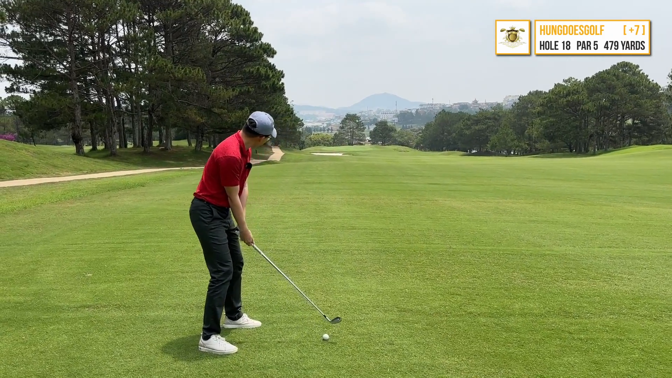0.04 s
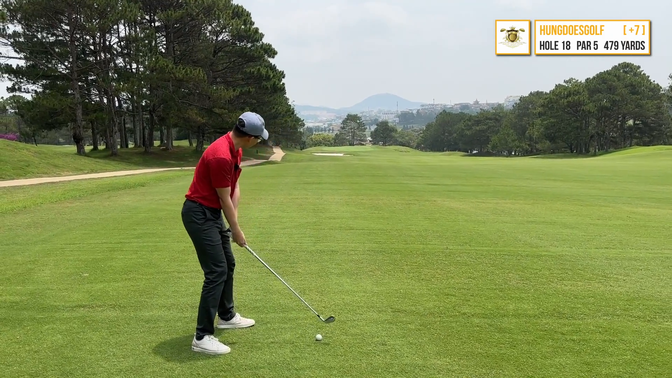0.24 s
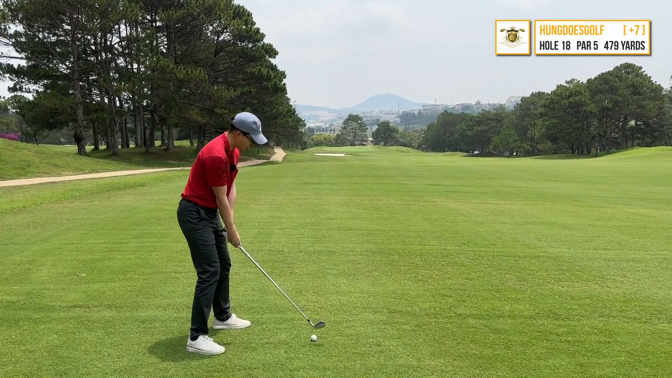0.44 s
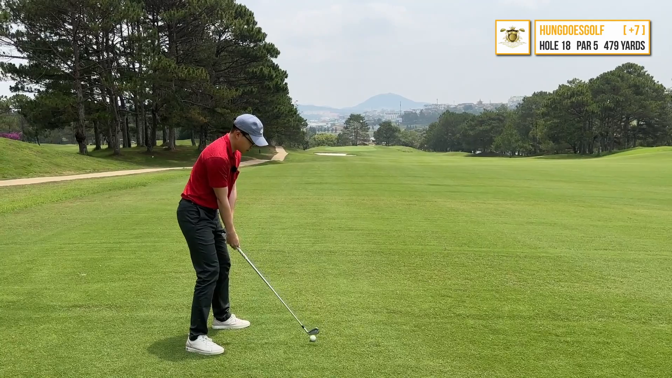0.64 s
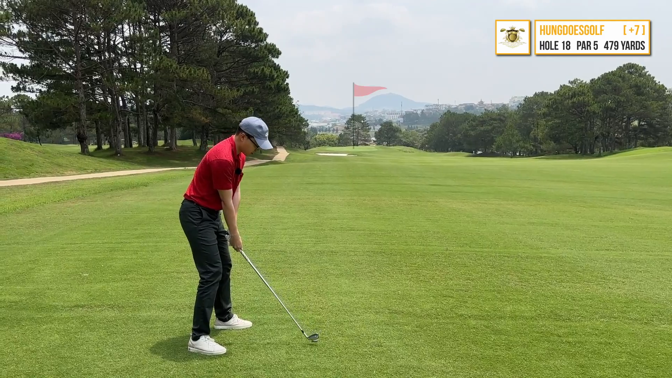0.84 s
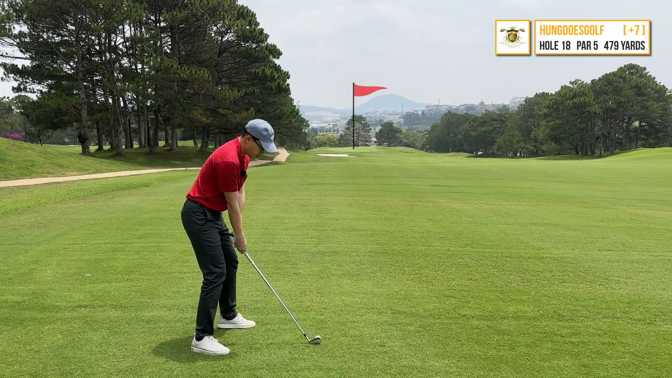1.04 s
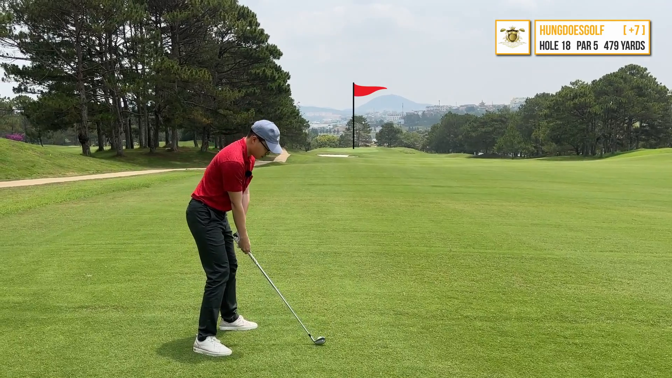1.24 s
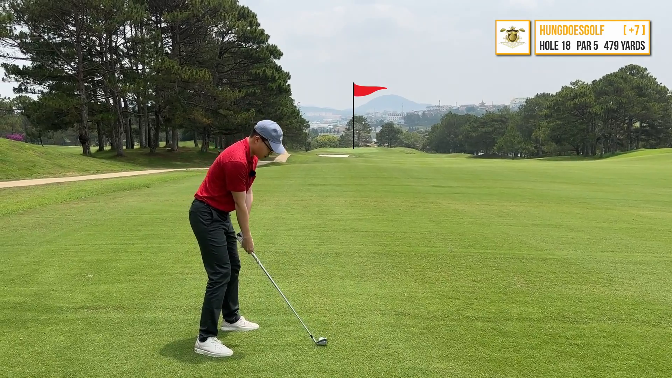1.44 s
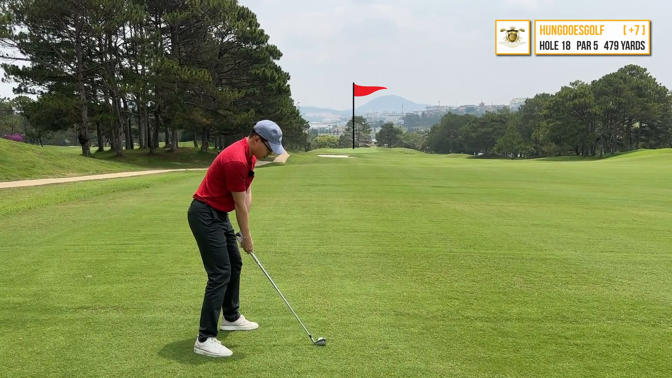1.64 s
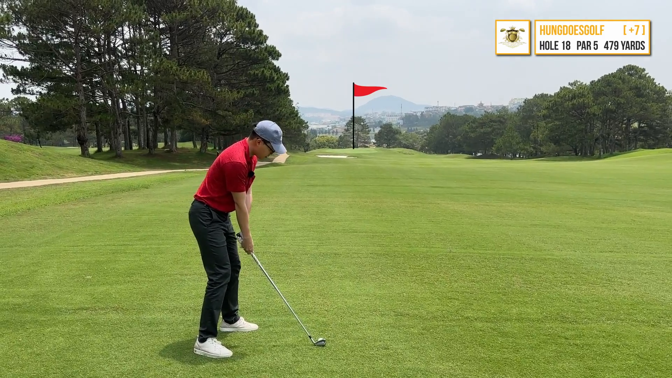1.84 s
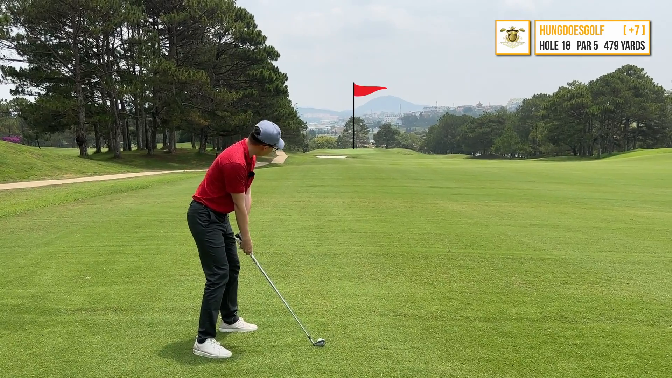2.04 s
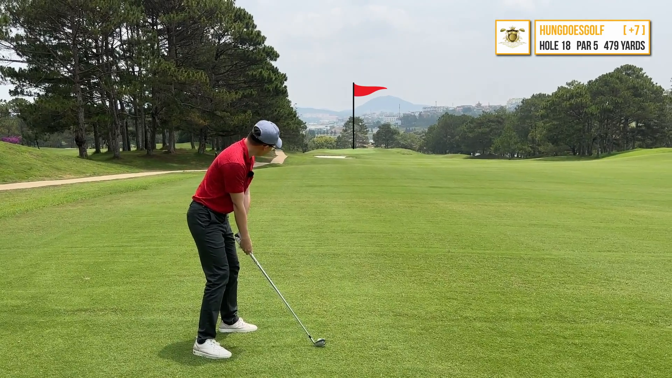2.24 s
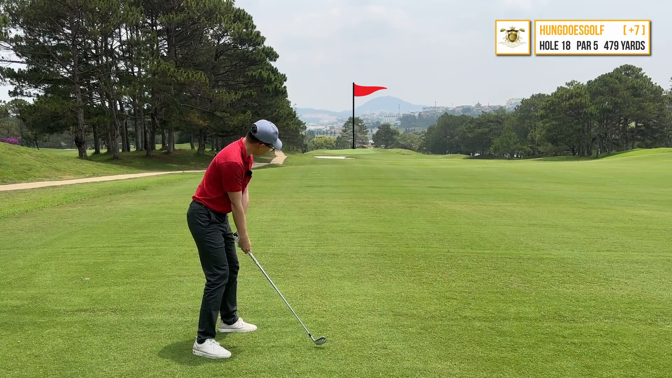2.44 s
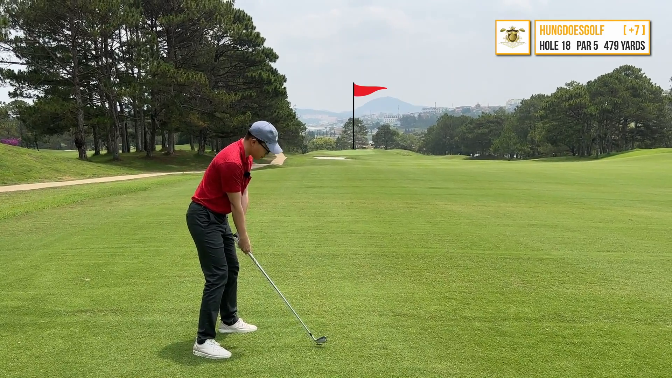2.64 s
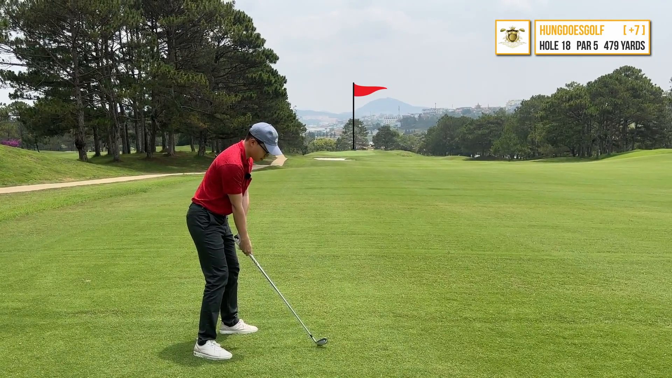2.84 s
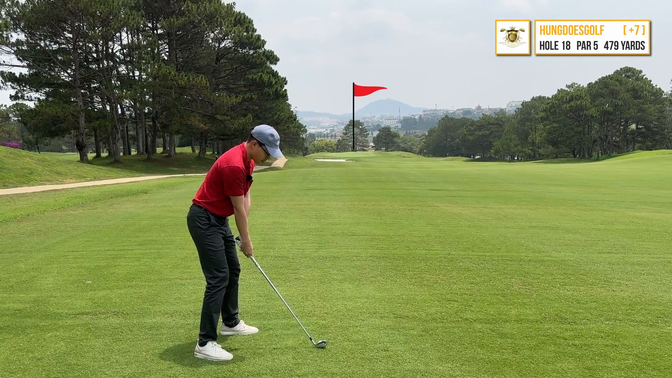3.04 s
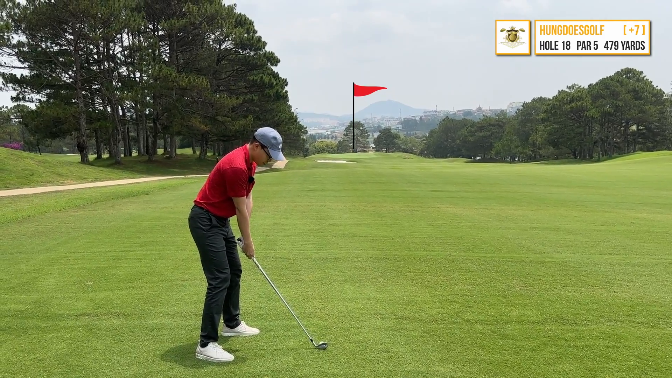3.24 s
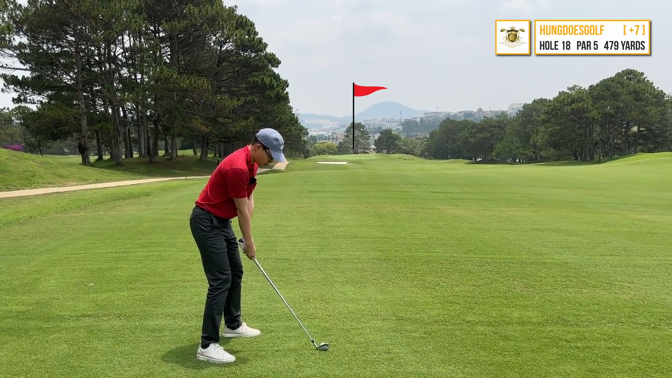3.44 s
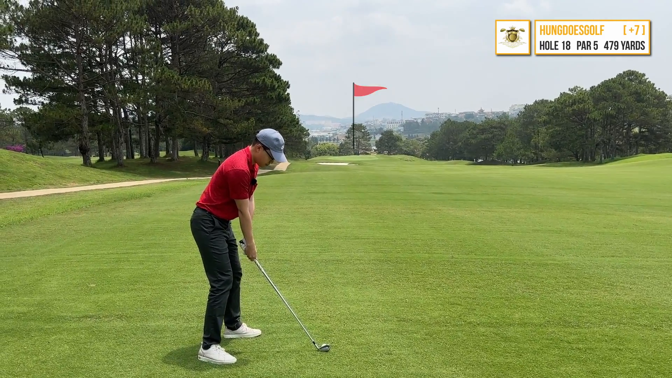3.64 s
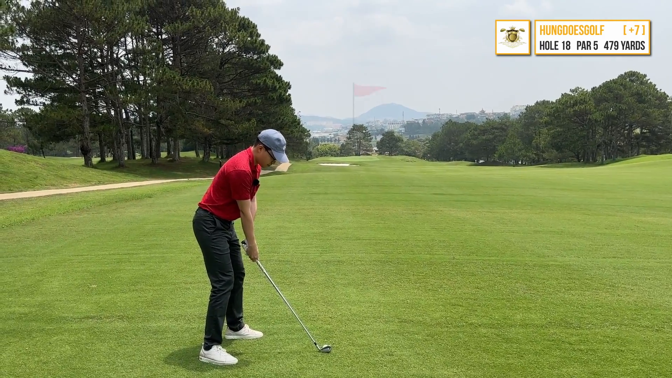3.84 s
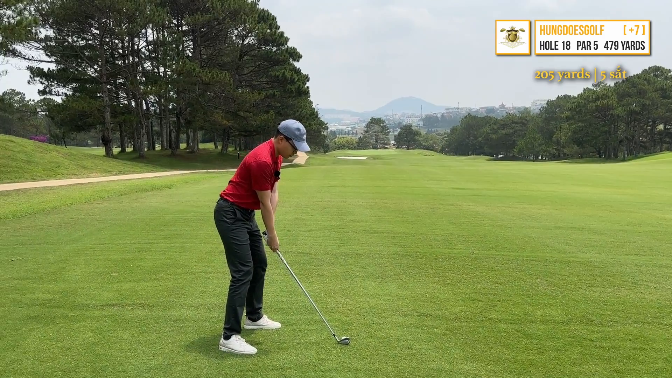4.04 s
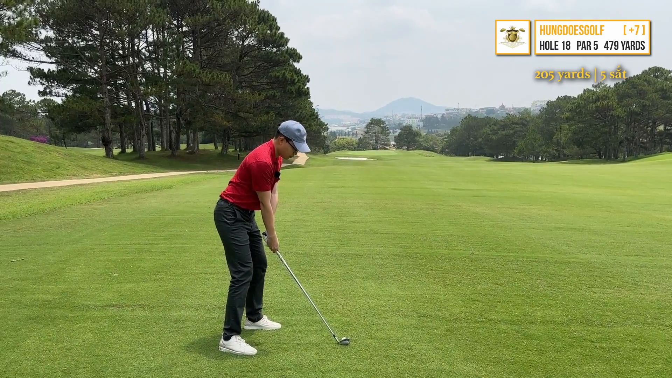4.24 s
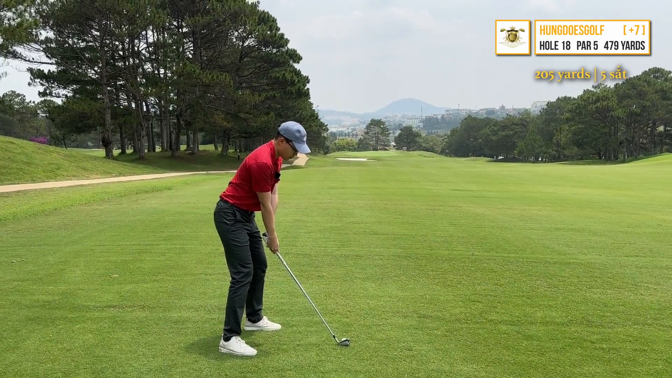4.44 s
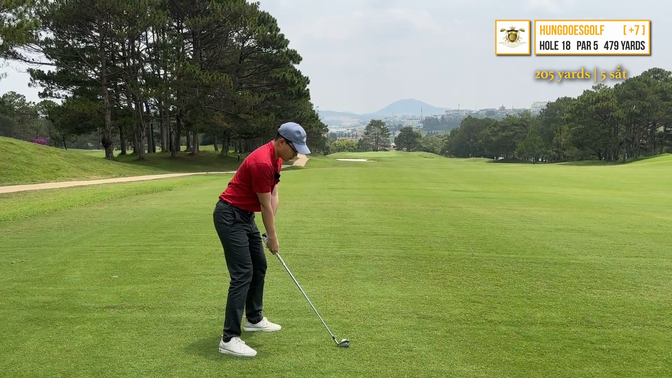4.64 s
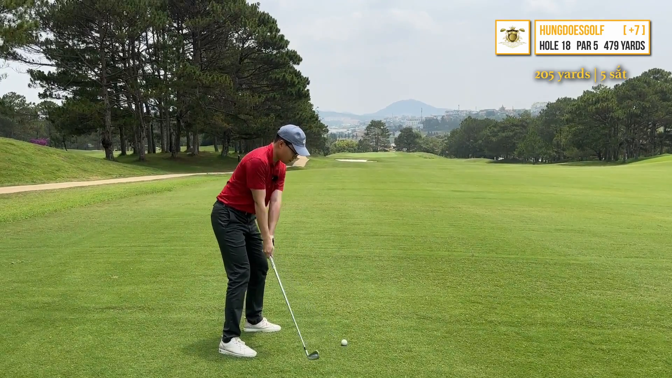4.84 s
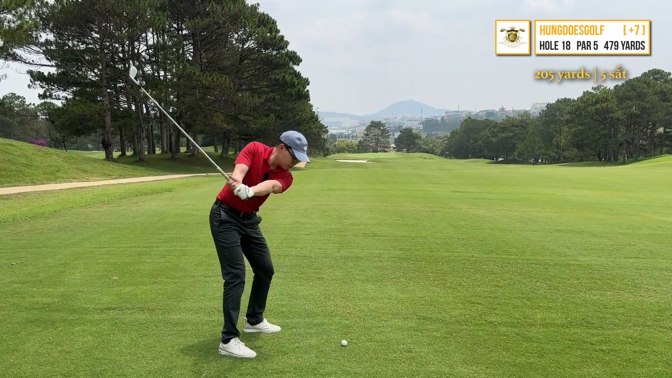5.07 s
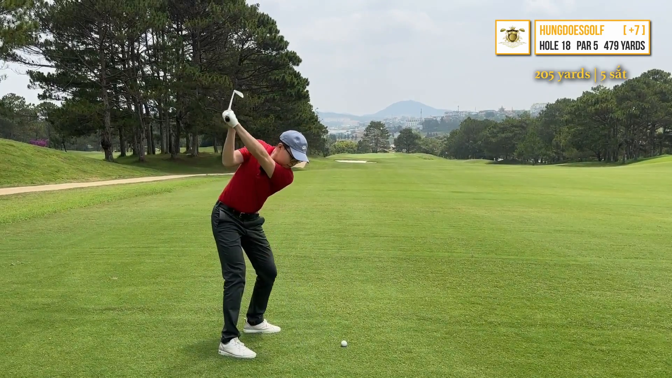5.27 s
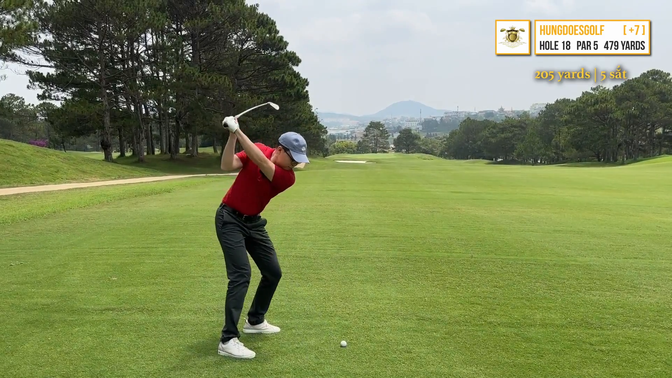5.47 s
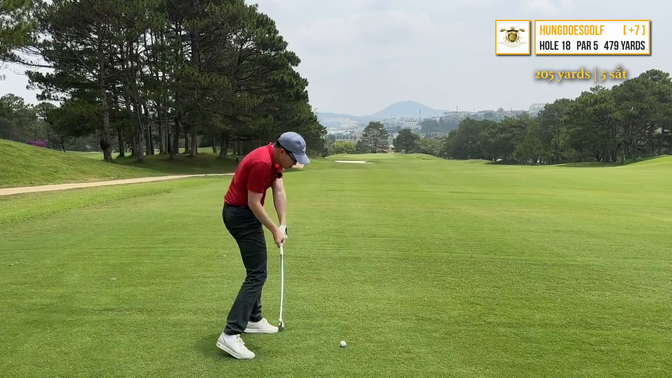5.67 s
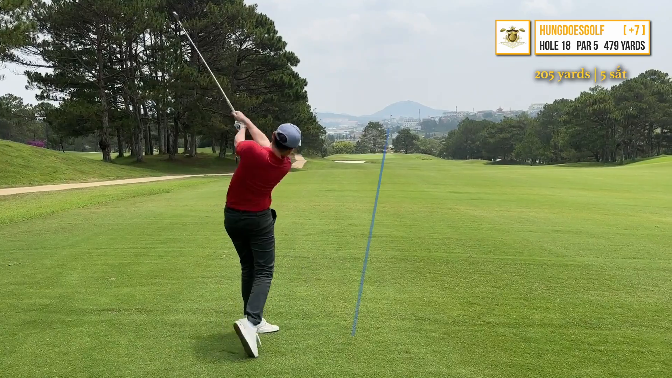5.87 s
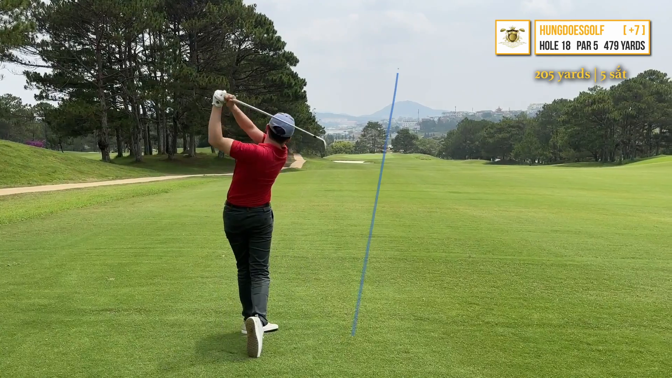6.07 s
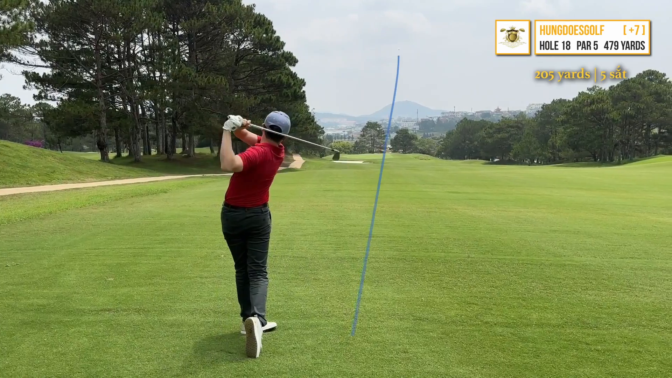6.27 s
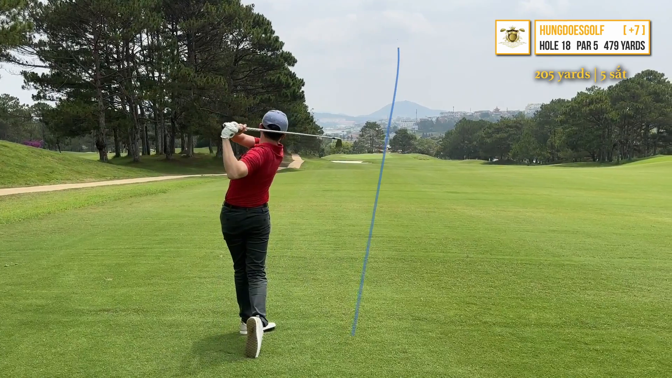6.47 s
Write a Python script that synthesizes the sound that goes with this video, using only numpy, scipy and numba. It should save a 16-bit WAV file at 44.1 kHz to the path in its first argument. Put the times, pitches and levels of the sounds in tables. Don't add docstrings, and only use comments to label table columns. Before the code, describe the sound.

Insects shimmer quietly outdoors for five seconds before clothing rustles, a golf club whips down, cracks the ball hard, and a heel thuds softly.

```python
import sys
import numpy as np
from scipy import signal
from scipy.fft import rfft, irfft, next_fast_len
from scipy.io import wavfile
from numba import njit

SR = 44100
rng = np.random.default_rng(int(sys.argv[2]) if len(sys.argv) > 2 else 0)


def field_ratio(decibels):
    return 10 ** (np.asarray(decibels, dtype=float) / 20)


def unload_audio(sound):
    columns = np.transpose(np.atleast_2d(sound))
    steps = np.round(np.clip(columns, -1, 1) * 32767)
    wavfile.write(sys.argv[1], SR, steps.astype(np.int16))


N = 287085

# (frequency [Hz], width [Hz], level [dB])
HIGH_TYMBAL = [(5396.5, 710, 0), (5620, 420, -1), (6300, 750, -0.5), (6772, 300, -7.5)]
LOW_TYMBAL = [(2903, 810, -2), (3500, 1400, -4.5), (4190, 1200, -2)]
# (time [s], level
# [dB], tilt [dB/octave])
CHORUS = [(0, -1, 6), (.28, -1, 6), (.5, 0, 5), (1.0, 0, 2), (1.4, -1.5, 0), (1.64, 1, -8), (1.85, 0, 2),
          (2.2, 0, -3), (2.5, 0, -8), (2.8, -1, 0), (3.05, 0, 0), (3.3, 0, -8), (3.65, .5, -4),
          (3.93, -1, 0), (4.1, .5, 2), (4.46, 0, -4), (4.8, 0, 2)]
# (time [s], level [dB])
BREEZE = [(0, -76), (.35, -73.5), (.5, -78.5), (.86, -69.5), (1.1, -78.5), (1.27, -71), (1.42, -81),
          (1.55, -74), (1.7, -81), (1.93, -70), (2.1, -72.5), (2.4, -80.5), (2.6, -78.5), (2.93, -72),
          (3.3, -76.5), (3.85, -76.5), (4.44, -76), (4.8, -72.5)]
# (time [s], level [dB])
BODY_SHAKE = [(4.6, -86), (5.02, -67), (5.22, -64), (5.44, -68), (5.51, -55), (5.69, -52), (5.83, -62.5),
              (6.51, -61)]
# (time [s], level [dB])
SUPPRESSOR = [(0, -2), (.6, 0), (4.3, 0), (4.65, -4), (4.83, -1.5), (4.86, -6), (5.0, -15), (5.36, -11),
              (5.45, -28)]
# (frequency [Hz], level [dB/Hz])
MURMUR_SPECTRUM = [(250, -8), (400, -2.5), (900, -1.5), (1500, -5), (2400, -6.5), (2800, -24)]
RUMBLE_SPECTRUM = [(18, -42.5), (30, -16), (91, 1.5), (188, -3), (301, -12.5), (364, -16), (500, -22.5),
                   (650, -54)]
AIR_SPECTRUM = [(2200, -12.5), (7000, -7), (9000, -13), (12000, -21), (13800, -26), (15500, -38)]
# (frequency [Hz], level [dB/Hz])
DULL_CLOTH = [(150, -15.5), (350, -3.5), (800, -0.5), (1600, -8.5), (2600, -7.5), (5000, -31)]
MIDDLE_CLOTH = [(800, -27), (1600, -14), (2500, 0.5), (4200, -1), (6500, -3.5), (9000, -15), (12000, -30.5)]
BRIGHT_CLOTH = [(4000, -18.5), (6000, -7), (7500, 0), (10500, -4), (13000, -12), (15500, -25)]
# (peak time [s], level [dB], 20 dB rise [s], 20 dB fall [s], brightness [dB])
RUBS = [(.105, -73, .06, .05, 10), (.25, -72, .06, .1, 10), (.37, -70.5, .3, .08, 10),
        (4.05, -76, .04, .3, 14), (4.31, -76, .1, .15, 14), (4.55, -73.5, 0.01, .06, 14),
        (4.66, -75, 0.47, .5, 4), (4.9, -79, 0.44, 0.73, 0.5), (5.12, -68, 0.42, .3, 1),
        (5.39, -57.5, 0.12, 0.4144, 11.5), (5.44, -57, 0.129, 0.1146, 5), (5.462, -47, .012, .06, 7),
        (5.477, -44, .04, .018, 6), (5.497, -56, .05, .05, -7), (5.54, -53.5, 0.307, 0.1044, 6),
        (5.575, -62, 0.0333, 0.08, -6), (5.66, -68, 0.2935, 0.46, -8), (5.745, -64, .15, 0.22, -2),
        (5.87, -70, 0.29, 0.18, -5), (6.05, -73, 0.5878, .5, -12), (6.13, -66, .25, .15, -4),
        (6.25, -70, .1, .1, 4), (6.33, -68, 0.21, 0.11, -3), (6.44, -64.5, 0.1643, 0.07, 0),
        (6.51, -57, 0.0943, 1.3, -2)]
# (start time [s], length [s])
BAND_GAPS = [(.45, .1), (.62, .04), (1.2, .05), (1.86, .04), (2.09, .03), (2.37, .06), (2.66, .09),
             (2.77, .025), (2.84, .05), (2.97, .04), (3.08, .03), (3.2, .03), (3.34, .06), (3.7, .04),
             (3.87, .05), (3.95, .04), (4.16, .04), (4.29, .04)]
# (time [s], peak level [dB], low edge [Hz], high edge [Hz])
SNAPS = [(.1827, -57, 7500, 12000), (1.4628, -60, 3500, 13000), (2.02, -63, 8000, 13000),
         (2.138, -63, 7500, 10500), (3.599, -63, 7500, 11000), (3.321, -56, 1500, 5000),
         (5.102, -58, 400, 1500), (3.3097, -33, 5600, 8600), (3.3097, -50, 8600, 11500),
         (4.8419, -26, 2980, 6780), (4.8409, -50.5, 1100, 1800), (4.842, -44, 8000, 13500),
         (4.9315, -40, 2700, 4500), (4.932, -42, 6500, 8600), (4.932, -48, 10000, 11800),
         (4.9513, -47, 6000, 11500), (4.9513, -35, 2800, 5600), (4.9765, -48, 2500, 9000),
         (5.175, -59, 9500, 12500), (5.9, -60, 7000, 10500), (5.915, -62, 7500, 10500),
         (5.878, -58, 6500, 8000), (6.098, -55, 6000, 8000), (5.175, -56, 4500, 7500),
         (5.144, -55, 4000, 5200), (5.073, -57, 5500, 8000), (3.665, -68, 7000, 12000),
         (3.845, -63, 7000, 9500), (5.312, -49.5, 150, 1600), (5.357, -49.5, 4000, 10900),
         (5.441, -39.5, 4000, 11040), (5.505, -27.5, 2980, 10800), (5.851, -50, 2500, 4000),
         (6.095, -50, 1800, 3400), (6.099, -56, 2001, 8490), (6.143, -52, 2002, 11500),
         (6.157, -51, 2496, 7000), (6.163, -52.5, 3500, 5550), (6.1715, -57.5, 3000, 7540),
         (6.188, -51, 3500, 6500)]
# (time [s], peak level [dB], pitch [Hz], T60 [s])
CHIRPS = [(.603, -63, 2940, 0.09), (1.2, -58, 3185, 0.084), (3.83, -62, 3300, 0.133),
          (4.022, -56, 3200, 0.082), (4.085, -63.5, 2600, 0.185), (2.785, -60, 3000, .08),
          (3.55, -60, 3100, 0.08), (3.5, -64, 3000, .1)]
# (time [s], peak level [dB], pitch [Hz], T60 [s], ground echo [dB])
KNOCKS = [(1.205, -68, 665, 0.0346, -20), (5.505, -19, 5530, 0.0032, 0), (5.5052, -28, 3660, 0.006, 1.5),
          (5.5051, -27, 7200, .003, 0), (5.5623, -7, 6900, .0025, -30), (5.562, -10, 1500, .004, -30),
          (5.5594, -8, 7000, .0022, -30), (5.5645, -19, 3850, .0105, -12), (5.564, -15.5, 6000, .009, -12),
          (5.5552, -38, 6200, .002, -30), (5.5552, -38, 11000, .002, -30), (5.5685, -29, 900, .006, -6),
          (5.584, -46, 2000, .01, -30), (5.7307, -28.5, 950, 0.0036, -9.5), (5.7305, -31, 2800, .0035, -7),
          (5.732, -41, 3800, .004, -10), (5.712, -42, 2500, .007, -30), (5.7095, -42, 4100, .006, -30)]
# (time [s], peak level [dB], low edge [Hz],
# high edge [Hz], T60 [s])
CRACKS = [(5.558, -21, 650, 1400, .01), (5.5594, -13, 4000, 10000, .004), (5.561, -6.5, 4000, 11000, .007),
          (5.5612, -13.5, 10000, 15990, 0.0043), (5.563, -28, 900, 7000, 0.02),
          (5.565, -33, 10500, 14500, .018), (5.575, -43, 250, 600, .08), (5.57, -45, 700, 1400, .1),
          (5.525, -46, 6500, 9500, .12), (5.466, -35, 3800, 5500, .045), (5.5, -42, 200, 600, .12),
          (5.525, -48, 900, 2000, .1), (5.456, -42, 1200, 2800, .1), (5.454, -42, 5000, 10500, .09),
          (5.572, -51, 8500, 15800, .09), (5.5608, -24, 10300, 11300, .005), (5.607, -52, 2000, 9000, .012),
          (5.59, -52, 5800, 7196, 0.16)]
# (time [s], peak level [dB], low edge [Hz], high edge [Hz])
SCUFFS = [
    (5.512, -40, 500, 1800),
    (5.516, -47, 2496, 5000),
    (5.7076, -42, 2270, 4780),
    (5.708, -46, 5440, 11880),
]
# (start time [s], end
# time [s], start pitch [Hz], end pitch [Hz], level [dB])
THIN_TONES = [(5.91, 5.96, 1180, 1090, -67), (5.915, 5.99, 1730, 1600, -65), (5.945, 5.975, 1220, 1280, -65),
              (5.965, 6.04, 1440, 1290, -61), (5.955, 6.05, 770, 650, -66), (5.975, 6.02, 1170, 1130, -65),
              (6.04, 6.085, 1320, 1050, -68), (6.26, 6.32, 790, 740, -62), (6.1, 6.135, 480, 450, -64),
              (6.13, 6.19, 560, 500, -68), (6.09, 6.135, 600, 500, -65), (6.21, 6.26, 620, 880, -68),
              (6.27, 6.3, 1000, 1150, -66), (6.18, 6.215, 430, 400, -66), (5.86, 5.93, 760, 700, -69),
              (3.31, 3.7, 4120, 4080, -80)]
# (time [s], level [dB], pitch [Hz], T60 [s], sign)
THUDS = [
    (5.497, -48.5, 90.5, 0.052, -0.95),
    (5.56, -37, 110.6, .08, -1.12),
    (5.5637, -28, 450, 0.014, 0.89),
    (5.5584, -17, 950, .007, -1),
    (5.569, -25, 300, .0045, -1.2),
    (5.577, -38, 200, 0.014, -1.1),
    (5.7038, -25.5, 167, 0.00845, 1),
    (5.7078, -22, 88, 0.034, -0.95),
    (5.7328, -38, 297, 0.00706, 1),
    (5.751, -47, 86, 0.107, 0.7),
]
# (time [s], pitch [Hz], level [dB])
DOWNSWING = [(5.515, 600, -62), (5.53, 620, -46), (5.544, 760, -39), (5.551, 700, -33), (5.5575, 630, -34),
             (5.56, 650, -52)]
# (frequency [Hz], direct level [dB], ground echo level [dB], T60 [s])
FACE_MODES = [(690, -24, -21, 0.0075), (1379, -8, -13.5, .007), (1880, -12, -11, 0.006),
              (2600, -7, -12, 0.0067), (3250, -11, -11, 0.0068), (3980, -14, -3, 0.0058),
              (4668, -1, -9, .0058), (5600, -11, -9.5, 0.005), (7000, -7, -7, .005),
              (9233, -20, -3.5, 0.0034), (12300, -34, -14.5, .004), (5900, -20, -9, .004),
              (930, -18, -20, .007), (8010, -12, -7, .0045)]
# (time [s], pitch [Hz], level [dB])
FOLLOW_THROUGH = [(5.89, 1699, -71.5), (5.93, 1600, -59), (6.02, 1330, -55.5), (6.075, 1000, -55.5),
                  (6.11, 557, -51.5), (6.2, 500, -56), (6.258, 759, -54), (6.29, 900, -59),
                  (6.36, 745, -78.5)]


def rms_one(x):
    return x / np.sqrt(np.mean(x ** 2) + 1e-20)


def in_time(rows, outside=None):
    s, *columns = np.transpose(rows)
    t = np.arange(N) / SR
    return [np.interp(t, s, column, outside, outside) for column in columns]


def drift(rate_hz):
    r = np.exp(-80 * np.pi * rate_hz / SR)
    noise = rng.standard_normal(N // 40 + 2002)
    slow = signal.lfilter([1], [1, -2 * r, r * r], noise)[2000:]
    return np.interp(np.arange(N) / 40, np.arange(len(slow)), rms_one(slow))


def coloured(x, spectrum):
    size = next_fast_len(N)
    hz = np.maximum(np.arange(size // 2 + 1) * SR / size, 1)
    points_hz, level_db = np.transpose(spectrum)
    gain = field_ratio(np.interp(np.log(hz), np.log(points_hz), level_db, -90, -90))
    return rms_one(irfft(rfft(x, size) * gain, size)[:N])


def grains(per_s, spread_db):
    sizes = field_ratio(spread_db * np.minimum(rng.exponential(1, N), 4)) * rng.choice([-1, 1], N)
    return sizes * (rng.random(N) < per_s / SR)


def resonate_twice(x, hz, width_hz):
    r = np.exp(-np.pi * width_hz / SR)
    top, bottom = [(1 - r * r) / 2, 0, (r * r - 1) / 2], [1, -2 * r * np.cos(2 * np.pi * hz / SR), r * r]
    return signal.lfilter(top, bottom, signal.lfilter(top, bottom, x))


def swell(s, db, rise_s, fall_s):
    t = np.arange(N) / SR
    return field_ratio(db - 20 * np.maximum((s - t) / rise_s, (t - s) / fall_s))


def add_mode(out, s, db, hz, t60, softness):
    t = np.arange(round(t60 * SR)) / SR
    fall = np.log(1000) * t / t60
    envelope = (np.e * fall) ** softness * np.exp(-fall)
    at = round(s * SR)
    out[at:at + len(t)] += field_ratio(db) * envelope * np.sin(2 * np.pi * hz * t)


@njit
def gliding(x, turn, r):
    y = np.zeros(len(x))
    for i in range(2, len(x)):
        drive = (1 - r[i] * r[i]) / 2 * (x[i] - x[i - 2])
        y[i] = drive + 2 * r[i] * np.cos(turn[i]) * y[i - 1] - r[i] * r[i] * y[i - 2]
    return y


def cicadas(modes, throb_db, tilt_db=0):
    out = 0
    for hz, width_hz, level_db in modes:
        clicks = grains(3500, 1.5) * field_ratio(throb_db * drift(70) + .7 * drift(8))
        octaves = np.log2(hz / modes[1][0])
        out = out + field_ratio(level_db + tilt_db * octaves) * rms_one(resonate_twice(clicks, hz, width_hz))
    return rms_one(out)


def field():
    breeze_db, cut_db = in_time(BREEZE)[0], in_time(SUPPRESSOR)[0]
    gust_db = breeze_db + 77
    chorus_db, tilt_db = in_time(CHORUS)
    steep = signal.butter(6, 7300, fs=SR, output="sos")
    high = signal.sosfilt(steep, cicadas(HIGH_TYMBAL, throb_db=2.2, tilt_db=tilt_db))
    out = field_ratio(-55.5 + chorus_db + cut_db) * high
    out += field_ratio(-74 + .35 * gust_db + .3 * cut_db) * cicadas(LOW_TYMBAL, throb_db=2.5)

    murmur_db = -85.5 + .8 * gust_db + 1.0 * drift(42)
    out += field_ratio(murmur_db) * coloured(rng.standard_normal(N), MURMUR_SPECTRUM)

    rumble = np.hypot(field_ratio(breeze_db + 0.71), field_ratio(in_time(BODY_SHAKE, -120)[0]))
    out += rumble * field_ratio(0.8 * drift(9)) * coloured(rng.standard_normal(N), RUMBLE_SPECTRUM)

    samples = np.arange(N)
    air_db = -77 - 1.1 * samples / SR + .15 * gust_db
    air_db += 1.2 * np.minimum(cut_db, 0) * (samples > SR)
    return out + field_ratio(air_db + 1.5 * drift(12)) * coloured(rng.standard_normal(N), AIR_SPECTRUM)


def rustle():
    power = 0
    for *shape, tilt_db in RUBS:
        colour_db = [[-tilt_db], [0], [-8 + .15 * tilt_db]]
        power = power + (swell(*shape) * field_ratio(colour_db)) ** 2
    together = field_ratio(1.2 * drift(40))
    out = np.zeros(N)
    for level, colour in zip(power, (DULL_CLOTH, MIDDLE_CLOTH, BRIGHT_CLOTH)):
        out += np.sqrt(level) * together * coloured(grains(9000, 2.6), colour)
    stretch = rms_one(resonate_twice(grains(9000, 2.0), 3300, 1700))
    return out + swell(5.09, -62, .35, .45) * stretch


def band_gaps(x):
    low_hz, high_hz, share = 7400, 9600, .6
    hz, s, frames = signal.stft(x, SR, nperseg=1024)
    for start, length in BAND_GAPS:
        chosen = rng.random(len(hz) // 3 + 1).repeat(3)[:len(hz)] < share
        shut = (hz > low_hz) & (hz < high_hz) & chosen
        frames[np.ix_(shut, (s > start) & (s < start + length))] = 0
    return signal.istft(frames, SR, nperseg=1024)[1][:N]


def puffs():
    spread = 1.157
    chirps = [(s, db, hz / spread, hz * spread, t60) for s, db, hz, t60 in CHIRPS]
    snaps = []
    for s, db, low_hz, high_hz in SNAPS:
        t60 = np.clip(16 / np.sqrt(low_hz * high_hz), .00299, .00614)
        snaps.append((s, db, low_hz, high_hz, t60))
    scuffs = [(*row, 0.019) for row in SCUFFS]
    return chirps + snaps + scuffs + CRACKS


def ticks():
    ground_lag_s = 0.001215
    out, noise = np.zeros(N), rng.standard_normal(N)
    fall = np.log(1000) * np.arange(SR // 4) / SR
    for s, db, low_hz, high_hz, t60 in puffs():
        at = round(s * SR)
        puff = noise[at:at + len(fall)] * fall / t60 * np.exp(1 - fall / t60)
        puff[round(t60 * SR / 7)] += 0.04 / t60
        band = signal.butter(3, [low_hz, high_hz], "band", fs=SR, output="sos")
        puff = signal.sosfilt(band, puff + 1e-18)
        out[at:at + len(fall)] += field_ratio(db) * puff / np.abs(puff).max()
    for s, db, hz, t60, echo_db in KNOCKS:
        add_mode(out, s, db, hz, t60, softness=0.52)
        add_mode(out, s + ground_lag_s, db + echo_db, hz, t60, softness=0.304)
    return out


def whoosh(rows, sharpness):
    hz, level_db = in_time(rows)[0], in_time(rows, -120)[1]
    turn, r = 2 * np.pi * hz / SR, np.exp(-np.pi * hz / sharpness / SR)
    eddies = gliding(gliding(rng.standard_normal(N), turn, r), turn, r)
    return field_ratio(level_db - 6.0) * rms_one(eddies)


def waggle():
    s = 1.896 + np.cumsum([0, 0.122, 0.141, 0.091])
    return whoosh([(at, 715, -69 - under_db) for at, under_db in zip(s, (12.5, 0, 0, 25))], 2.0)


def thin_tones():
    out, waver, flutter = np.zeros(N), drift(120), drift(90)
    for start, end, start_hz, end_hz, db in THIN_TONES:
        at = np.arange(round(start * SR), round(end * SR))
        hz = np.linspace(start_hz, end_hz, len(at)) * (1 + 0.018 * waver[at])
        level = field_ratio(db + 2.5 + 3.5 * flutter[at]) * np.hanning(len(at)) ** 0.21
        out[at] += level * np.sin(2 * np.pi * np.cumsum(hz) / SR)
    return out


def thuds():
    out = np.zeros(N)
    for s, db, hz, t60, sign in THUDS:
        blow = np.zeros(N)
        add_mode(blow, s, db, hz, t60, softness=0.89)
        out += sign * blow
    return out


def singing_shaft():
    hz, level_db = in_time(DOWNSWING)[0], in_time(DOWNSWING, -120)[1]
    wavering_hz = hz * (1 + 0.022 * drift(90))
    return field_ratio(level_db + 1.8 * drift(80)) * np.sin(2 * np.pi * np.cumsum(wavering_hz) / SR)


def strike():
    impact_s, ground_lag_s = 5.5597, .00165
    grass_lead_s, spray_t60_s = .0012, .02
    out = np.zeros(N)
    for hz, direct_db, echo_db, t60 in FACE_MODES:
        add_mode(out, impact_s, direct_db, hz, t60, softness=.6)
        add_mode(out, impact_s + ground_lag_s, echo_db, hz, t60, softness=.6)
    t = np.arange(N) / SR - impact_s
    shape = np.clip(1 + t / grass_lead_s, 0, 1) * field_ratio(-60 * np.clip(t, 0, 1) / spray_t60_s)
    spray = coloured(rng.standard_normal(N), [(400, 0.5), (4000, 0), (9000, -13), (15500, -21.5)])
    return out + field_ratio(-23) * shape * spray


def scene():
    around = band_gaps(field() + rustle())
    swish = waggle() + thin_tones() + singing_shaft() + whoosh(FOLLOW_THROUGH, 1.6)
    near = ticks() + thuds() + strike()
    return (around + swish + near)[None]


def top_cut(x):
    return signal.sosfilt(signal.butter(12, 16490, fs=SR, output="sos"), x)


def record(dry):
    rounded = 1.08 * np.tanh(dry / 1.08)
    low_pass = signal.cheby2(10, 60, 17000, fs=SR, output="sos")
    mix = signal.sosfilt(low_pass, rounded)
    return top_cut(mix)


dry = scene()
out = record(dry)
unload_audio(out)
```